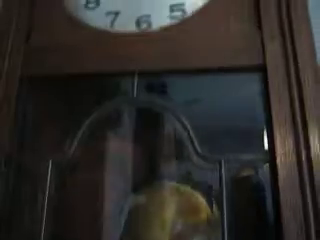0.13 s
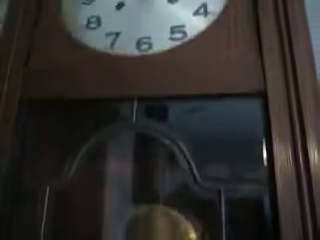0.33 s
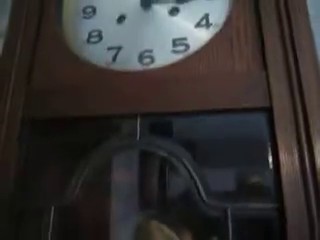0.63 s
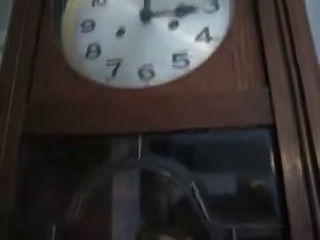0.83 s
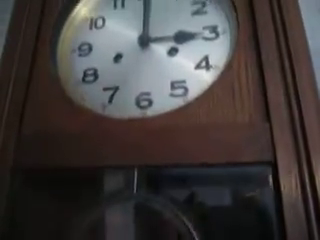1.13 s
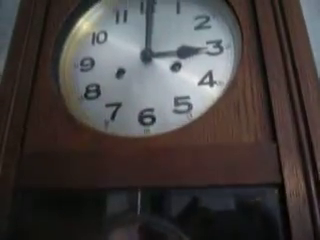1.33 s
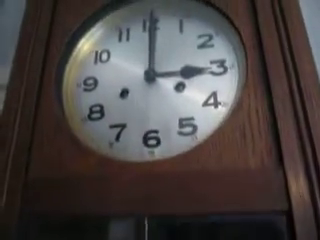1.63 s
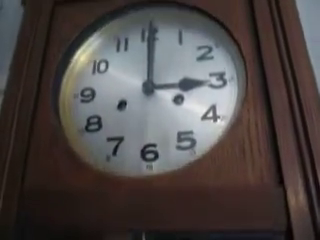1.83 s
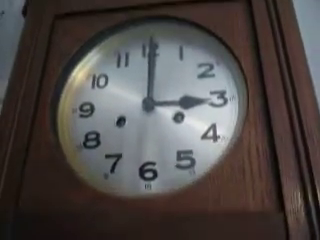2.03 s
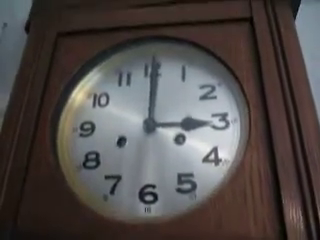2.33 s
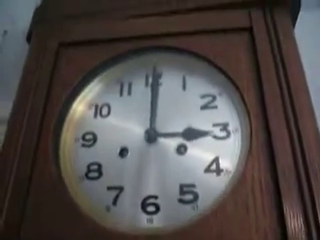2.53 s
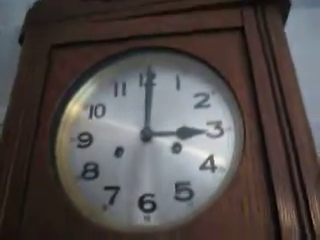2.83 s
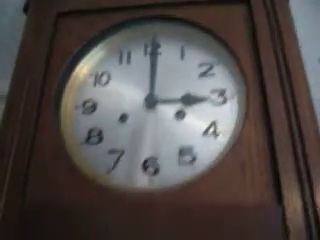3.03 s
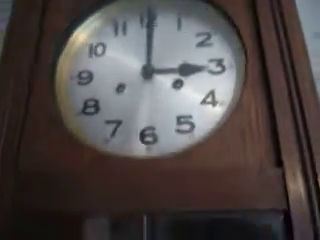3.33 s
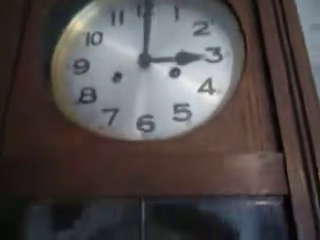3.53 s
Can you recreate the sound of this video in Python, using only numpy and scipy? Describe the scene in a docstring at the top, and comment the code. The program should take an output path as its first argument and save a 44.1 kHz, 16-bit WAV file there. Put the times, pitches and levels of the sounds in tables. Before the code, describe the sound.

A pendulum wall clock ticks softly, slightly out of beat, as a faint gong ring fades. A thin second tick joins once a second. Gritty narrow-band hiss throughout; fingers knock the hand-held camera, mostly later.

```python
"""A quiet room's dull air noise, under the steady gritty hiss of a hand-held camera's coarse, narrow-band converter.
Gong rods ring on faintly from the hour as beating sine pairs. A thin, quick tick, probably a second clock, sounds
about once a second. Then a pendulum wall clock ticks softly, a little out of beat: rattling noise in the resonances
of movement and case. Fingers rub the camera as shaped noise, and knock on it as contact noise and shell modes."""
import sys
import numpy as np
from scipy import signal
from scipy.fft import rfft, irfft
from scipy.io import wavfile

SR = 44100
rng = np.random.default_rng(int(sys.argv[2]) if len(sys.argv) > 2 else 0)


def transcribe(signal):
    """Save signal, clipped to [-1, 1], as a 16-bit WAV file at the path in sys.argv[1]."""
    frames = np.atleast_2d(signal).T
    limited = np.clip(frames, -1, 1)
    pcm = np.round(limited * 32767).astype(np.int16)
    wavfile.write(sys.argv[1], SR, pcm)


N = 163170
TIME_S = np.arange(N) / SR
FREQ_HZ = np.fft.rfftfreq(N, 1 / SR)


def amp(db):
    """Decibels to gain."""
    return 10 ** (np.asarray(db) / 20)


def unit(x):
    """Scales to rms 1."""
    return x / np.sqrt(np.mean(x ** 2) + 1e-20)


def read_curve(points, hz):
    """Interpolates (freq_hz, value) points on a log-frequency axis."""
    freq_hz, value = np.transpose(points)
    return np.interp(np.log(hz + 1), np.log(freq_hz + 1), value)


def noise(gain):
    """Gaussian noise of rms 1, shaped by a gain at each frequency."""
    white = rfft(rng.standard_normal(N))
    return unit(irfft(white * gain, N))


# air noise spectrum: freq_hz, relative_level_db
ROOM_SPECTRUM = [(25, -23.5), (60, -14), (100, -5), (170, 1), (250, 0), (450, -3.5), (620, -4.5), (780, -6),
                 (1050, -7.5), (1600, -11.5), (2500, -16.5), (3800, -22)]


def room():
    """Steady dull air noise whose level swells very slightly, below about 4 Hz."""
    level_db, swell_rms_db = -49.5, 0.92
    swell = noise((FREQ_HZ > 0) / (1 + (FREQ_HZ / 4) ** 4))
    air = noise(amp(read_curve(ROOM_SPECTRUM, FREQ_HZ)))
    return amp(level_db + swell_rms_db * swell) * air


# gong rod partials, each a close pair: freq_hz, beat_hz, first_swell_s, level_db, twin_rel_db, fade_db_per_s
GONG_PARTIALS = [(485.7, 1, 0, -64, -18, 2.5), (576.7, 4.6, .245, -59.5, 2, 4.2),
                 (643.7, 3.3, .18, -62.5, 1, 4), (812, 4.66, .205, -56.2, 1, 1.8),
                 (975.6, 1, 0, -67, -15, 3.5), (1716.6, 9.5, .1, -64, -5, 4.5)]


def gong():
    """The rods' last ring: pairs of close partials beat as they fade."""
    out = np.zeros(N)
    for freq_hz, beat_hz, swell_s, level_db, twin_rel_db, fade_db_per_s in GONG_PARTIALS:
        cycles = freq_hz * TIME_S
        twin_cycles = cycles + beat_hz * (TIME_S - swell_s)  # in phase at swell_s
        pair = np.sin(2 * np.pi * cycles) + amp(twin_rel_db) * np.sin(2 * np.pi * twin_cycles)
        out += amp(level_db - fade_db_per_s * TIME_S) * pair
    return out


def ringing(modes):
    """Dense rattle: noise of rms 1 in a set of resonances; width_hz is the -6 dB width."""
    gain = 0
    for freq_hz, width_hz, rel_db in modes:
        gain = gain + amp(rel_db) / (1 + ((FREQ_HZ - freq_hz) / (width_hz / 2)) ** 2)
    return noise(gain)


def decay(start_s, t60_s, rise_s):
    """Linear rise, times an exponential fall of 60 dB in t60_s."""
    age_s = np.maximum(TIME_S - start_s, 0)
    return np.minimum(age_s / rise_s, 1) * np.exp(-np.log(1000) * age_s / t60_s)


# impacts in a beat, as the pallet releases and the tooth lands: delay_s, level_db
BEAT_IMPACTS = [(0, -4), (.008, 1.5), (.02, -3.5)]


def beat(start_s):
    """Envelope of one escapement beat: quick impacts and a longer tail, summed in power."""
    impact_t60_s, tail_t60_s, tail_db = .04, .32, -10
    power = (amp(tail_db) * decay(start_s, tail_t60_s, .012)) ** 2
    for delay_s, level_db in BEAT_IMPACTS:
        power += (amp(level_db) * decay(start_s + delay_s, impact_t60_s, .001)) ** 2
    return np.sqrt(power)


# thin ticks: start_s, level_db
THIN_TICK_TIMES = [(0.125, -51), (1.139, -51), (2.145, -51), (3.16, -47)]
# thin tick resonances: freq_hz, width_hz, rel_db
THIN_RESONANCES = [(2557, 370, -11), (3010, 430, -9), (3751, 81, 1.5)]


def thin_ticks():
    """A small, high tick about once a second: rattle in high resonances, gated by beat envelopes."""
    envelope = sum(amp(level_db) * beat(start_s) for start_s, level_db in THIN_TICK_TIMES)
    return ringing(THIN_RESONANCES) * envelope


# escapement beats: start_s, level_db, case_rel_db (the case's hollow note)
CLOCK_BEATS = [(.621, -45, -6), (1.117, -47, 0.5), (1.732, -43.5, -9.5), (2.219, -42.5, -4),
               (2.829, -47.5, -10), (3.323, -41, -6.5)]
# brass movement resonances: freq_hz, width_hz, rel_db
MOVEMENT_RESONANCES = [(2294, 220, -5.5), (2525, 190, 2.5), (2757, 250, -9), (3330, 220, -10)]


def wall_clock():
    """Each beat rings brass movement and wooden case; every other beat sounds the case more strongly."""
    case_hz, case_width_hz, case_gain_db = 1083, 190, 1
    brass = ringing(MOVEMENT_RESONANCES)
    wood = amp(case_gain_db) * ringing([(case_hz, case_width_hz, 0)])
    out = np.zeros(N)
    for start_s, level_db, case_rel_db in CLOCK_BEATS:
        out += amp(level_db) * beat(start_s) * (brass + amp(case_rel_db) * wood)
    return out


# fingers rubbing on the shell: start_s, length_s, level_db
RUB_STROKES = [(0.678, 0.075, -48.5), (2.447, .09, -61), (3.251, 0.057, -52.5), (3.613, 0.072, -50.5)]
# rub spectrum: freq_hz, relative_level_db
RUB_SPECTRUM = [(200, -13.5), (500, 1.5), (1100, -2), (1700, -0.5), (2300, 1.5), (3000, -8.5), (4000, -15)]


def rubs():
    """Brief soft scrapes of skin on the shell: shaped noise under half-sine strokes."""
    stroke = np.zeros(N)
    for start_s, length_s, level_db in RUB_STROKES:
        phase = np.clip((TIME_S - start_s) / length_s, 0, 1)
        stroke += amp(level_db) * np.sin(np.pi * phase)
    return stroke * noise(amp(read_curve(RUB_SPECTRUM, FREQ_HZ)))


# finger knocks on the camera: start_s, bass_db, middle_db, treble_db
FINGER_KNOCKS = [(.8478, -35.5, -41, -58), (.8928, -39, -42, -56), (.8950, -42, -37.5, -35.5),
                 (.8966, -45, -41, -33.5), (2.5235, -44, -50, -58), (2.7298, -31, -40, -40.5),
                 (2.7372, -38.5, -52, -52), (2.7908, -49, -32.5, -46), (3.0555, -31, -42, -55),
                 (3.2568, -43, -34, -45), (3.2845, -43, -42, -55), (3.4875, -48, -32.5, -53)]
# where the three knock levels apply: freq_hz
KNOCK_POINTS_HZ = [480, 1200, 2600]
# camera shell modes, before detuning: freq_hz, rel_db, t60_s
SHELL_MODES = [(360, -3, .06), (548, -3, .06), (835, -2, .04), (1010, -3, .04), (1190, -6, .03),
               (1330, -6, .03), (1530, -8, .028), (2130, -9, .02), (2500, -8, .022), (2720, -7, .02),
               (3180, -9, .02)]


def knocks():
    """Contact noise and shell modes, weighted by where and how hard the finger lands."""
    contact_db, contact_t60_s, rise_s = -2.5, 0.013, 0.00052
    detune = 1 + 0.0089 * rng.standard_normal((len(FINGER_KNOCKS), len(SHELL_MODES)))
    age_s = TIME_S[:4096]
    grit = rng.standard_normal((len(FINGER_KNOCKS), len(age_s)))
    bins_hz = np.fft.rfftfreq(len(age_s), 1 / SR)
    lowpass = 1 / (1 + (bins_hz / 3200) ** 12)
    passband = lowpass * bins_hz ** 2 / (bins_hz ** 2 + 300 ** 2)
    contact_fall = np.exp(-np.log(1000) * age_s / contact_t60_s)
    out = np.zeros(N)
    for (start_s, *band_db), shifts, burst in zip(FINGER_KNOCKS, detune, grit):
        spectrum = list(zip(KNOCK_POINTS_HZ, band_db))
        ring = np.zeros(len(age_s))
        for (freq_hz, rel_db, t60_s), shift in zip(SHELL_MODES, shifts):
            mode = np.sin(2 * np.pi * freq_hz * shift * age_s)
            fall = np.exp(-np.log(1000) * age_s / t60_s)
            ring += amp(rel_db + read_curve(spectrum, freq_hz)) * fall * mode
        contact = irfft(rfft(burst) * passband * amp(read_curve(spectrum, bins_hz)))
        contact = contact / np.sqrt(np.mean(passband ** 2)) * amp(contact_db) * contact_fall
        knock = (ring + contact) * np.minimum(age_s / rise_s, 1)
        part = out[round(start_s * SR):][:len(age_s)]
        part += knock[:len(part)]
    return out


def scene():
    """Room, clocks and handling at one microphone."""
    return (room() + gong() + thin_ticks() + wall_clock() + rubs() + knocks())[None]


def record(dry):
    """A slow converter, resting off zero, starts up and rounds to coarse steps; smoothing and band limit follow."""
    converter_hz, step_db, offset = 8000, -44.5, -.0583
    smooth_hz, edge_hz, start_s = 3935, 4600, .072
    slow = signal.resample(dry[0], round(N * converter_hz / SR))
    step = amp(step_db)
    steps = (np.floor(slow / step) + .5) * step + offset
    # back to SR: the slow spectrum repeats as images, which the smoothing suppresses
    image_bins = np.arange(len(FREQ_HZ)) % len(steps)
    images = np.fft.fft(steps)[image_bins] * N / len(steps)
    smoothing = 1 / (1 + np.minimum(FREQ_HZ / smooth_hz, 2) ** 24)
    smooth = irfft(images * smoothing, N) * (TIME_S > start_s)  # silent before start-up
    band_limit = signal.firwin(255, edge_hz, window=("kaiser", 7), fs=SR)
    return signal.oaconvolve(smooth, band_limit, "same")[None]


dry = scene()
out = record(dry)
transcribe(out)
```